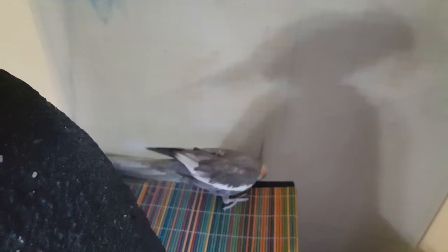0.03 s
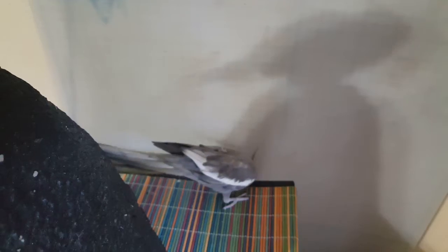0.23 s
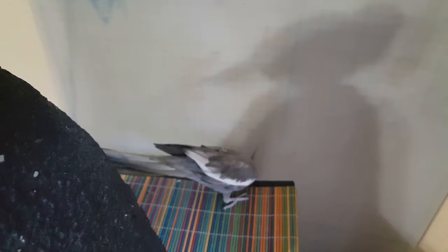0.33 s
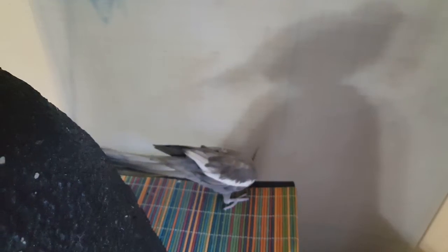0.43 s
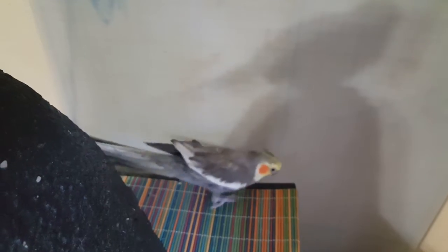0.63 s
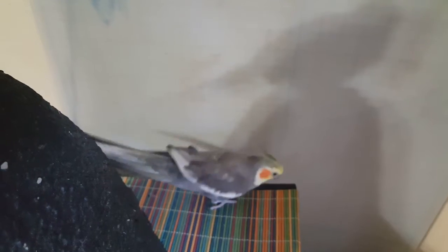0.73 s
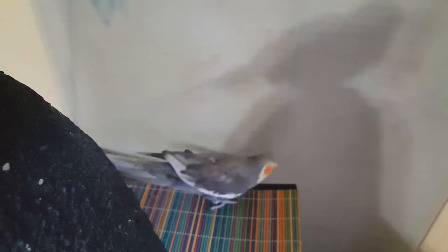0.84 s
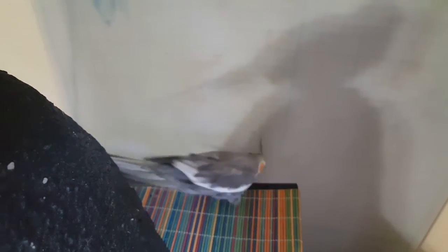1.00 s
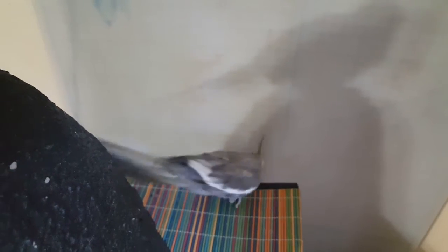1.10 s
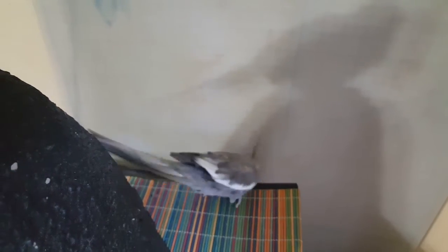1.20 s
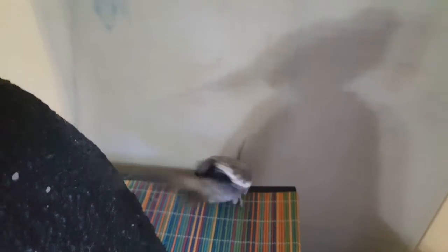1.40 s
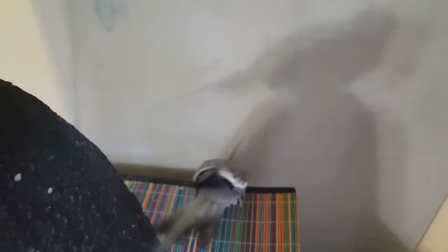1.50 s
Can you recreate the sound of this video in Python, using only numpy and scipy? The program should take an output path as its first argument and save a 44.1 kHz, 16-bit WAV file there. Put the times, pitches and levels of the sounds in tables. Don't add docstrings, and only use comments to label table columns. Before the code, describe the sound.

One brief raspy bird whistle rises and slides down in a quiet room, followed by claw ticks.

```python
import sys
import numpy as np
from scipy import signal
from scipy.fft import rfft, irfft, next_fast_len
from scipy.io import wavfile
from scipy.ndimage import map_coordinates

SR = 44100
rng = np.random.default_rng(int(sys.argv[2]) if len(sys.argv) > 2 else 0)


def unload_wav(signal):
    wavfile.write(
        sys.argv[1],
        SR,
        np.round(np.clip(np.atleast_2d(signal).T, -1, 1) * 32767).astype(np.int16),
    )


def voltage_ratio(decibels):
    exponent = np.asarray(decibels, float) / 20
    return 10 ** exponent


N = 68355


def unit(x):
    return x / np.sqrt(np.mean(x ** 2) + 1e-20)


def along(points, hz):
    f, v = np.transpose(points)
    return np.interp(np.log(hz + 1), np.log(f + 1), v)


def curves(rows):
    s, *cols = np.transpose(rows)
    return [np.interp(np.arange(N) / SR, s, c) for c in cols]


def wobble(rate):
    knots = rng.standard_normal(int(N * rate / SR) + 4)
    return map_coordinates(knots, [np.arange(N) * rate / SR])


def filtered(x, response):
    m = next_fast_len(N + SR // 2)
    return irfft(rfft(x, m) * response(np.fft.rfftfreq(m, 1 / SR)), m)[..., :N]


def noise(colour, channels):
    return unit(filtered(rng.standard_normal((channels, N)), lambda hz: voltage_ratio(along(colour, hz))))


# (frequency [Hz], level [dB])
HUM_COLOUR = [(24, -24), (40, 0), (171, -6.5), (354, -5.5), (789, -14.5), (895, -17.5), (1240, -20.5),
              (16000, -61.5)]
# (frequency [Hz], correlation [0-1])
ALIKE = [(60, 0.952), (240, 0.73), (950, 0.36), (3770, 0.014), (15000, 0.02)]


def hum():
    t = np.arange(N) / SR

    def mid_side(hz):
        angle = np.arccos(np.clip(along(ALIKE, hz), -1, 1)) / 2
        return voltage_ratio(along(HUM_COLOUR, hz)) * np.array([np.cos(angle), np.sin(angle)])

    mid, side = filtered(rng.standard_normal((2, N)), mid_side)
    tone = voltage_ratio(-60.5 + 1.2 * wobble(8)) * unit(np.array([mid + side, mid - side]))
    mains = voltage_ratio(-69 + 1.7 * wobble(14)) * np.sin(2 * np.pi * 121.7 * t)
    return tone + mains


# (time [s], width [s], level [dB])
HANDLING = [
    (.28, 0.042, -60.5),
    (0.441, 0.13, -58.5),
    (.52, 0.043, -57.5),
    (.67, 0.0127, -53.5),
]


def handling():
    t = np.arange(N) / SR
    swell = sum(voltage_ratio(db) * np.exp(-((t - s) / width) ** 2) for s, width, db in HANDLING)
    return swell * np.sin(2 * np.pi * 56.05 * t + 1.6 * wobble(10.0))


# (frequency [Hz], t60 [s])
ROOM_DECAY = [(300, 0.24), (2000, 0.2316), (6000, 0.373), (14000, 0.1)]


def room(x):
    hz, t, z = signal.stft(rng.standard_normal((2, SR // 2)), SR, nperseg=256)
    hz = hz[:, None]
    decay = voltage_ratio(-60 * t / along(ROOM_DECAY, hz))
    soaked = 1 + (hz / 4000) ** 2
    tail = signal.istft(z * decay / soaked, SR, nperseg=256)[1]
    late = np.pad(x, (300, 0))[None]
    return signal.fftconvolve(late, tail / np.linalg.norm(tail[0]), axes=1)[:, :N]


# (frequency [Hz], level [dB])
SHADOW = [(500, -13), (1300, -9.5), (2400, -3), (4400, -10), (8000, -25), (15000, -43)]
# (delay [s], left level [dB], right level [dB])
WALLS = [(.0021, -29.5, -3.5), (.0043, -52, -14.5), (.0072, -17.5, -22.5), (0.0123, -20.5, -7.5),
         (.017, -14.5, -20.5)]


def ports(hz):
    def late(s):
        return np.exp(-2j * np.pi * hz * s)

    def walls(side):
        stretch = 1 + .13 * side
        return sum(voltage_ratio(row[side]) * late(row[0] * stretch) for row in WALLS) / (1 + hz / 6000)

    left = 1 + walls(1)
    right = voltage_ratio(along(SHADOW, hz)) * late(0.0004617) + voltage_ratio(-9.0) * walls(2)
    return np.array([left, right])


# (time [s], level [dB])
STIR = [(0, 1), (.06, 8.5), (.12, 7.5), (.23, 8.5), (.55, -0.5), (1, 0), (1.3, 4), (1.55, 1)]
# (frequency [Hz], level [dB])
STIR_COLOUR = [(800, -4), (2000, 7), (5500, -6), (9000, -8), (16000, -9.5)]


def stir():
    return voltage_ratio(-72 + curves(STIR)[0] + 1.5 * wobble(29)) * noise(STIR_COLOUR, channels=2)


def puffs(rows):
    t = np.arange(N) / SR
    total = np.zeros(N)
    for s, length, db in rows:
        rise = np.clip((t - s) / 0.00105, 0, 1)
        fade = np.clip((s + length - t) / (0.702 * length), 0, 1)
        total += voltage_ratio(db) * rise * fade
    return voltage_ratio(3.4 * wobble(400)) * total


# (time [s], length [s], level [dB])
RUSTLES = [(.085, 0.016, -66.5), (0.123, 0.05, -66), (0.194, 0.027, -60.5), (0.579, 0.018, -71.5),
           (.81, 0.038, -68.5), (1.097, 0.0174, -63.5), (1.115, 0.11, -71), (1.174, 0.027, -70.5),
           (1.19, 0.038, -68.5), (1.198, .02, -64), (1.206, 0.019, -65), (1.256, 0.019, -62.5),
           (1.298, 0.032, -61), (1.318, 0.067, -77), (1.464, 0.0087, -69.5), (1.528, 0.049, -67.5)]
# (frequency [Hz], level [dB])
FEATHER = [(2500, -30), (4500, -1.5), (7000, -7), (9000, 1), (13000, -7.5), (16000, -3)]
# (time [s], length [s], level [dB])
SWISH = [
    (1.087, .045, -75),
    (1.13, .035, -73),
]
# (frequency [Hz], level [dB])
SWISH_COLOUR = [(4000, -40), (4700, -2), (5200, 0), (5700, -9), (6400, -40)]


def rustles():
    feathers = puffs(RUSTLES) * noise(FEATHER, channels=2) * voltage_ratio([[1.5], [-1.5]])
    return feathers + puffs(SWISH) * noise(SWISH_COLOUR, channels=2)


# (time [s], length [s], level [dB])
SCRATCHES = [(.686, 0.0083, -67), (.737, 0.0124, -65), (.815, 0.0199, -65), (.85, 0.0372, -72.5),
             (1.036, 0.0102, -69.5), (1.1, 0.032, -71.5), (1.206, 0.0117, -61), (1.245, 0.0194, -60),
             (1.387, 0.0232, -71.5), (1.508, 0.0107, -73), (1.522, 0.0092, -60.5)]
# (frequency [Hz], level [dB])
CLAW = [(600, -30), (1200, -5), (2100, 0), (3200, -7), (4500, -13), (6000, -30), (16000, -60)]
# (time [s], length [s], level [dB])
THUDS = [
    (.29, 0.042, -74.5),
    (1.19, 0.052, -65),
    (1.25, 0.168, -60.5),
    (1.37, 0.097, -70),
]
# (frequency [Hz], level [dB])
THUD_COLOUR = [(100, -28.5), (170, -3.5), (400, -4), (650, -14), (2000, -61)]


def footing():
    return puffs(SCRATCHES) * noise(CLAW, channels=1) + puffs(THUDS) * noise(THUD_COLOUR, channels=1)


# (time [s], peak level [dB], pitch [Hz], scrape [s])
TAPS = [(0.195, -62.5, 743, 0.018), (0.686, -51.5, 1047, 0.0033), (0.738, -43, 969.5, 0.00875),
        (.757, -55.5, 890, 0.0043), (.8075, -50.5, 4140, 0.0014), (0.827, -46.5, 1058, 0.0075),
        (0.851, -53.5, 1050, 0.015), (0.893, -52, 770, 0.0083), (1.002, -55.5, 796, 0.0286),
        (1.037, -44.5, 1174, 0.00445), (1.047, -51.5, 1067, 0.00196), (1.109, -45, 1013, 0.0109),
        (1.124, -52.5, 1068, 0.0084), (1.206, -46.5, 975, 0.007), (1.214, -44.5, 936, 0.0068),
        (1.246, -32, 949, 0.00501), (1.257, -36, 1083, 0.00902), (1.27, -42, 1011, 0.0072),
        (1.363, -51.5, 892, 0.019), (1.383, -52, 993, 0.0056), (1.425, -44.5, 764, 0.00583),
        (1.432, -45, 888, 0.00684), (1.446, -55.5, 786, 0.00285), (1.508, -55.5, 915, .004),
        (1.521, -52, 2096, .006), (1.525, -50.5, 753, 0.0106)]
# (frequency over pitch [ratio], width over pitch [ratio], level [dB])
SLATS = [(.6, 0.118, -7), (1, 0.1344, 0.5), (1.45, 0.51, -11), (2.1, 0.213, -8.5), (3.1, 0.54, -24),
         (4.8, 0.455, -24)]


def taps():
    out, t = np.zeros(N + SR), np.arange(4096) / SR
    f = np.fft.rfftfreq(len(t), 1 / SR)
    for s, db, hz, scrape in TAPS:
        grains = rng.standard_normal(len(t)) * voltage_ratio(5.22 * rng.standard_normal(len(t)))
        push = grains * np.exp(-t / max(scrape, .002)) * (1 - np.exp(-t / 0.00085)) * (t < .07)
        slats = 0
        for k, (ratio, width, level) in enumerate(SLATS):
            damping = 1j * f * width * hz
            slats = slats + (-1) ** k * voltage_ratio(level) * damping / ((ratio * hz) ** 2 - f * f + damping)
        hit = irfft(rfft(push) * slats)
        out[round(s * SR) - 60:][:len(t)] += voltage_ratio(db - 0.5) * hit / np.abs(hit).max()
    return out[:N]


# (time [s], level [dB])
SNAPS = [(.306, -30), (.3155, -30), (.318, -31), (.3275, -31), (.3305, -27), (.3398, -26), (.3425, -28),
         (.3515, -25), (.354, -33)]
# (frequency [Hz], level [dB])
SNAP_COLOUR = [(600, -30), (1300, -4), (2500, 0), (4000, -3), (6200, -10), (7500, -30), (16000, -45)]


def snaps():
    t = np.arange(N) / SR
    bursts = sum(voltage_ratio(db) * (t >= s) * np.exp(-np.abs(t - s) / .0006) for s, db in SNAPS)
    return 2 * filtered(bursts * rng.standard_normal(N), lambda f: voltage_ratio(along(SNAP_COLOUR, f)))


# (frequency [Hz], level [dB])
AIR = [(5000, -10.5), (8500, -12), (11000, -2), (14000, 2), (15200, -7.5), (15500, -57)]


def breath():
    t = np.arange(N) / SR
    strain = np.exp(-((t - .317) / .047) ** 4)
    return voltage_ratio(-24.5 + 3.6 * wobble(206)) * (strain + .06) * noise(AIR, channels=1)[0]


# (frequency [Hz], level [dB])
BEAK = [(300, -30), (1600, -6), (3500, 1.5), (5000, -5), (6300, -1.5), (9000, 1), (11500, 6.5),
        (15300, 0.5)]


def whistle(phase, hz, trough, tilt_db):
    t = np.arange(N) / SR
    smear = .45 * np.exp(-((t - .312) / .05) ** 4)
    turned = t > .3
    sheen_db = 24 * np.clip((t - .375) / .02, .15, 1)
    tone = np.cos(phase)
    for k in range(2, 11):
        blur = (smear * np.clip(k - 2.2, .06, 1) + .02) * k * wobble(700)
        dip = np.exp(-((k * hz - 9400) / 3000) ** 2)
        turned_db = turned * (-15 * dip + sheen_db * (1 - dip) * (k * hz > 9400))
        level_db = -6 - 5 * trough + turned_db + tilt_db * (k - 1.5) + along(BEAK, k * hz) + 2 * wobble(150)
        beak_limit = np.clip((15300 - k * hz) / 500, 0, 1)
        tone += voltage_ratio(level_db) * beak_limit * np.cos(k * phase + blur + .45 * (k - 2) ** 2)
    return tone


# (time [s], mean pitch [Hz], trill depth [Hz])
PITCH = [
    (.237, 1590, 65),
    (.262, 1645, 85),
    (.3, 1860, 250),
    (.312, 2320, 330),
    (.335, 2690, 300),
    (.358, 2800, 130),
    (.385, 2385, 35),
    (.41, 1850, 25),
    (.432, 1660, 0),
]
# (time [s], level [dB], brightness [dB per harmonic], rasp [dB], trill swell [dB])
EFFORT = [
    (.237, -19, -2.5, -27, 3),
    (.26, -19.5, -3, -28.5, 0),
    (.285, -23.5, -5.5, -51, -1),
    (.312, -20, -6.5, -9.5, 9.5),
    (.344, -22.5, -7, -19, 36),
    (.358, -28, -8.5, -15, -1.5),
    (.376, -30.5, -5.5, -21.5, -2.5),
    (.388, -21, -16.5, -31, -1.5),
    (.43, -28, -3.5, -57, 12),
]
# (frequency [Hz], level [dB])
RASP = [(250, -22), (1100, -7), (2200, 0), (3500, -6), (5800, -9), (7200, -30), (16000, -40)]


def chirp():
    t = np.arange(N) / SR
    pitch, depth = curves(PITCH)
    level_db, tilt_db, rasp_db, swell_db = curves(EFFORT)
    cycles = np.maximum(78.5 * (t - .2472), -.5) + 95 * np.maximum(t - .31, 0) ** 2
    swing = 2 * np.pi * cycles
    lean = .45 * np.clip((t - .3) / .02, 0, 1)
    trough = (1 - np.cos(swing + lean * (1 - np.cos(swing)))) / 2
    rasp = voltage_ratio(rasp_db) * (.25 + .75 * trough)
    hz = pitch + depth * (1 - 2 * trough) + 25 * wobble(248.95) + 264 * rasp * wobble(900)
    phase = 2 * np.pi * np.cumsum(hz) / SR
    tone = voltage_ratio(-swell_db * trough ** 2) * whistle(phase, hz, trough, tilt_db)
    scratch = rasp * noise(RASP, channels=1)[0] * voltage_ratio(3.5 * wobble(500))
    gate = np.clip((t - .2358) / .003, 0, 1) * np.clip((.4355 - t) / .015, 0, 1)
    return gate * voltage_ratio(level_db + 1.0) * (tone + scratch + breath()) + snaps()


def scene():
    bird, claws = chirp(), taps()
    lag_s = np.array([[0], [0.0001427]])
    near = filtered(claws, lambda hz: np.exp(-2j * np.pi * hz * lag_s))
    background = hum() + handling() + stir()
    answers = voltage_ratio(-20) * room(bird) + voltage_ratio(-19) * room(claws)
    return background + answers + rustles() + footing() + near + filtered(bird, ports)


def low_pass(x):
    return signal.sosfilt(signal.butter(12, 16050, fs=SR, output="sos"), x)


def record(dry):
    def band(hz):
        return (hz < 16100) * hz ** 4 / (hz ** 4 + 38 ** 4)

    return low_pass(filtered(dry, band) - .0005)


dry = scene()
out = record(dry)
unload_wav(out)
```